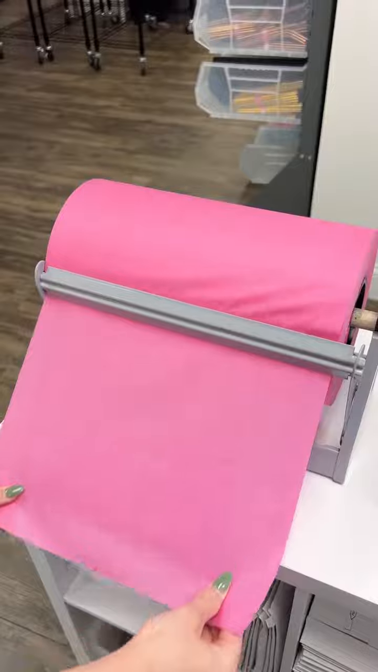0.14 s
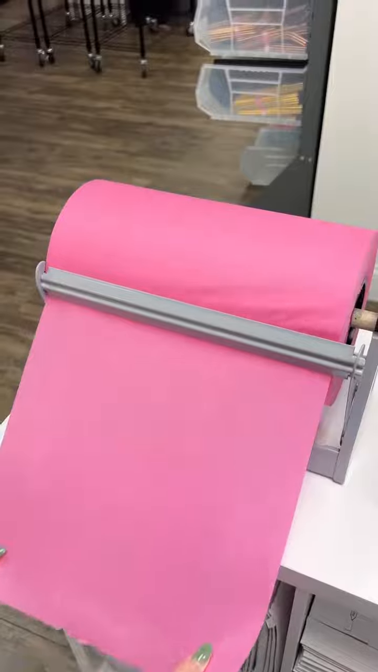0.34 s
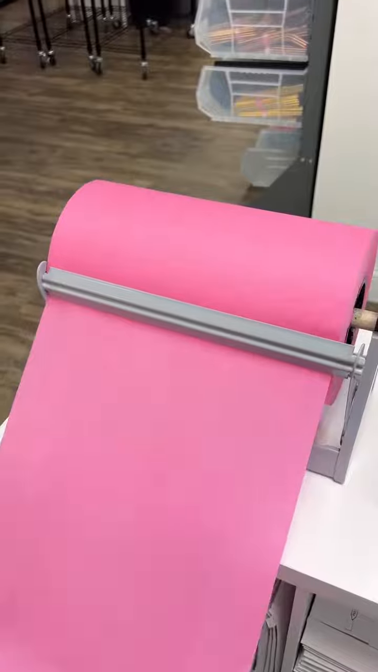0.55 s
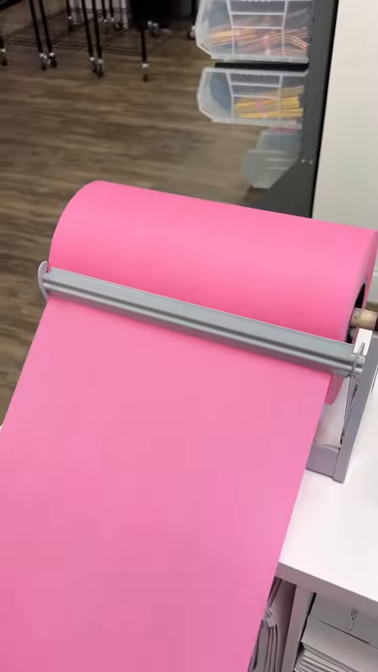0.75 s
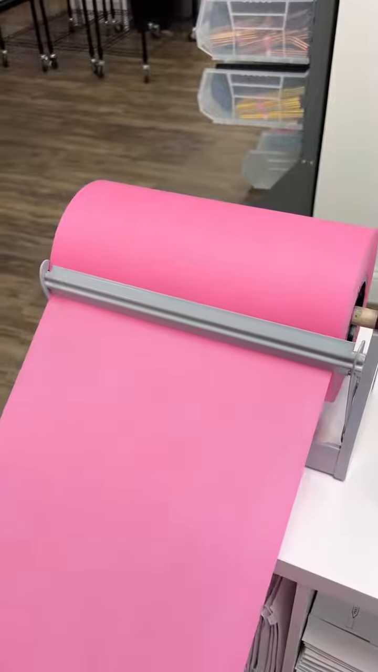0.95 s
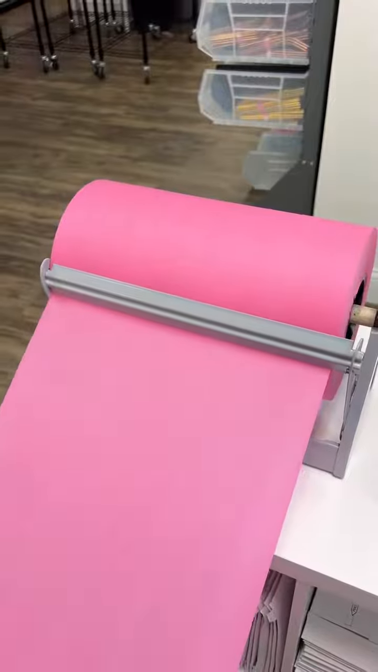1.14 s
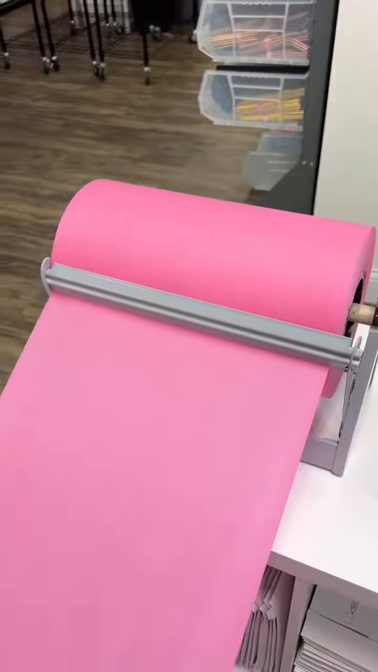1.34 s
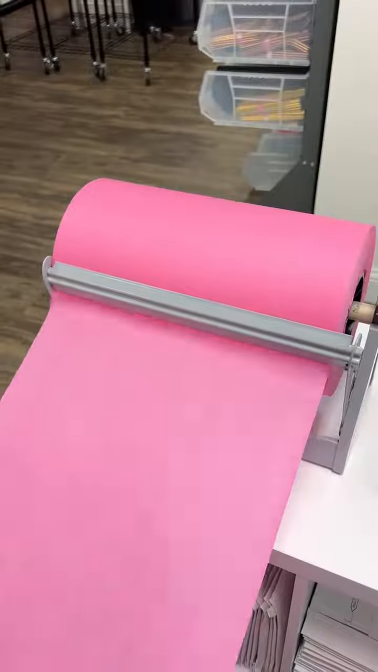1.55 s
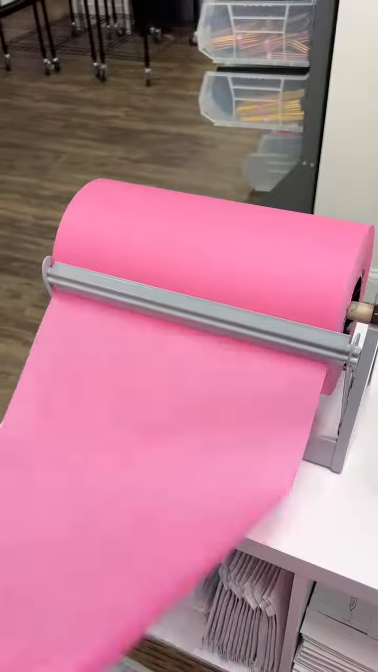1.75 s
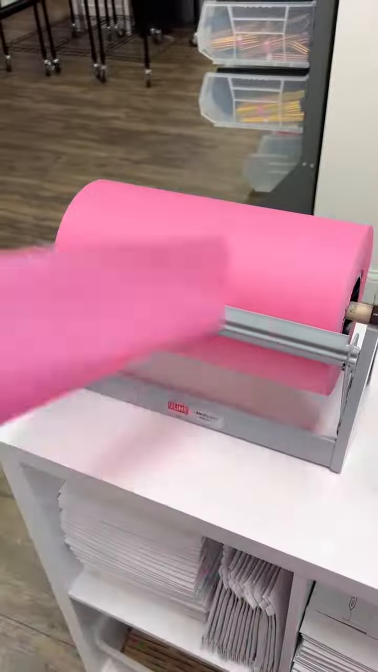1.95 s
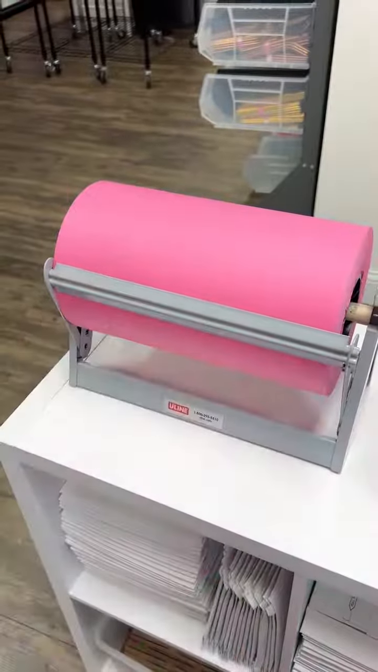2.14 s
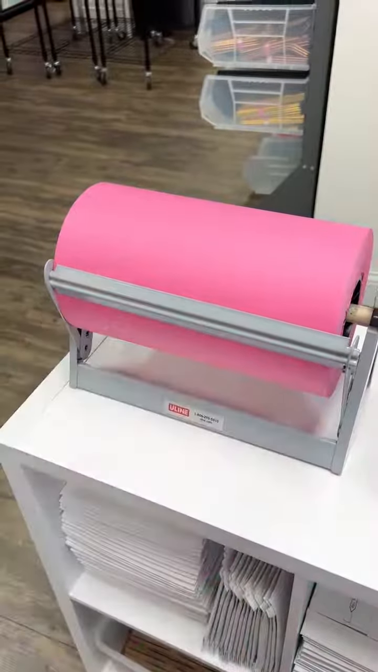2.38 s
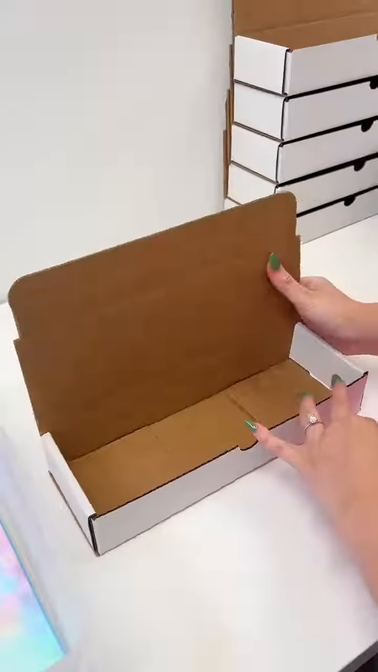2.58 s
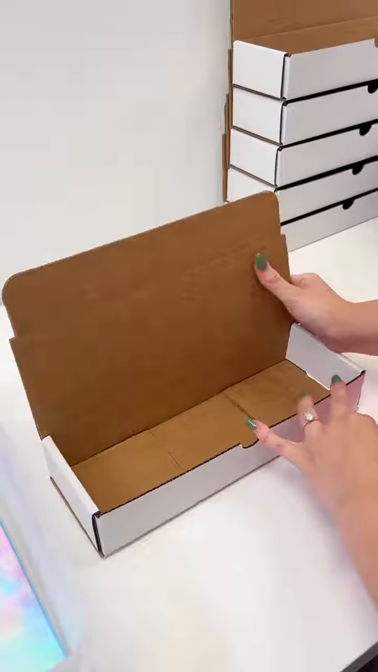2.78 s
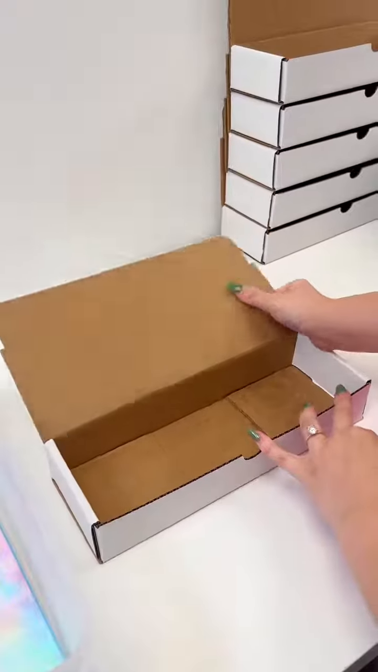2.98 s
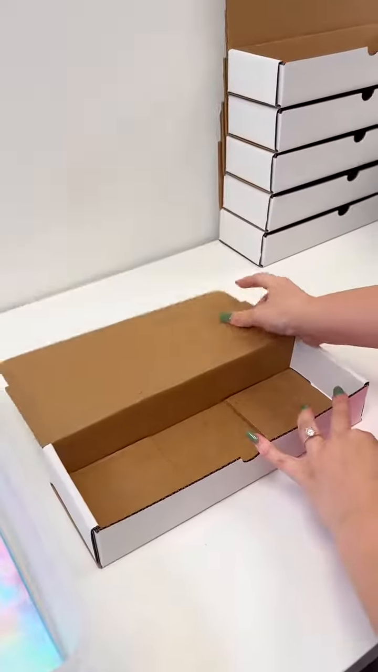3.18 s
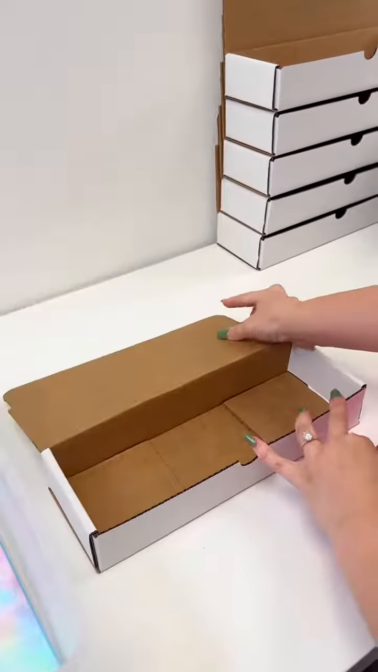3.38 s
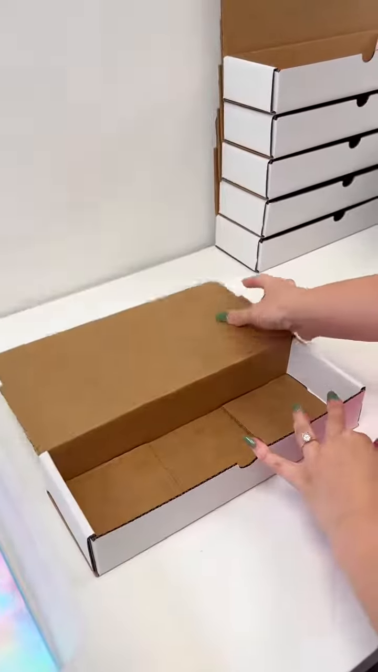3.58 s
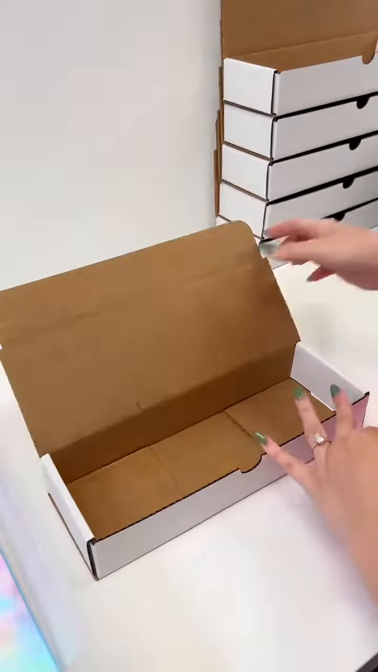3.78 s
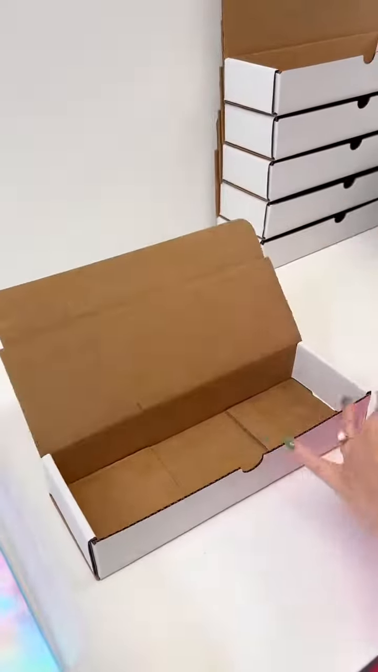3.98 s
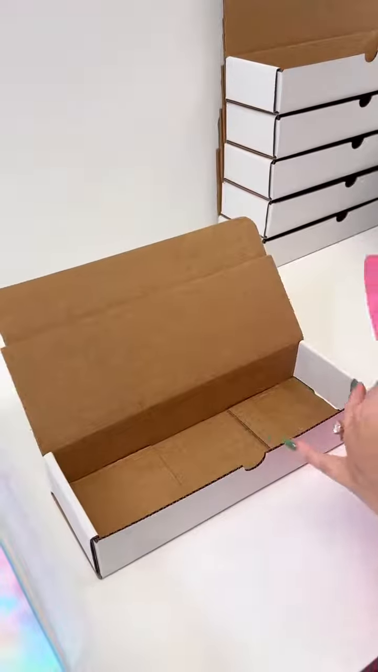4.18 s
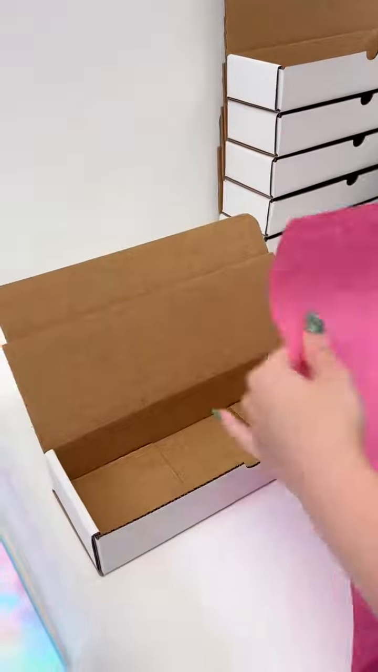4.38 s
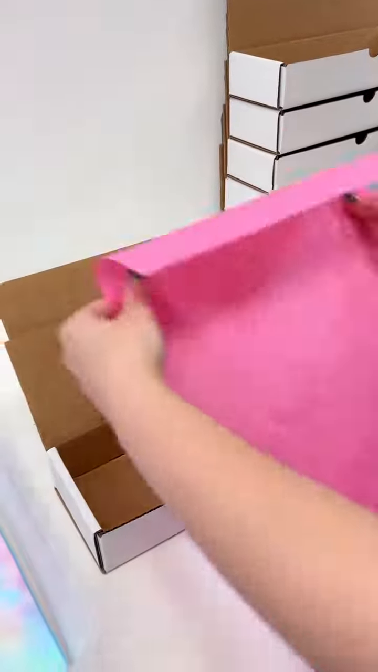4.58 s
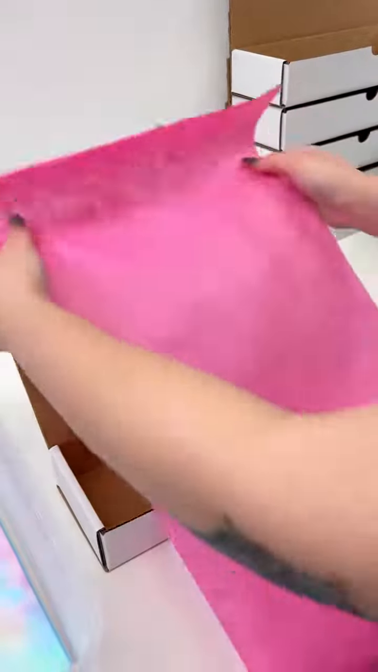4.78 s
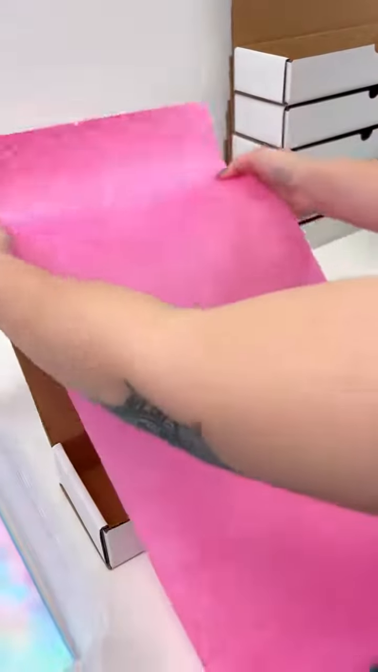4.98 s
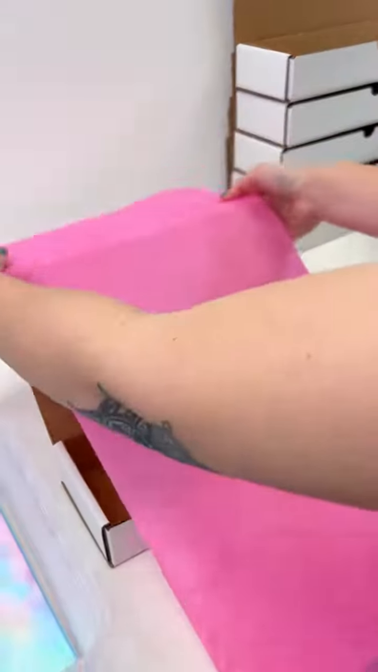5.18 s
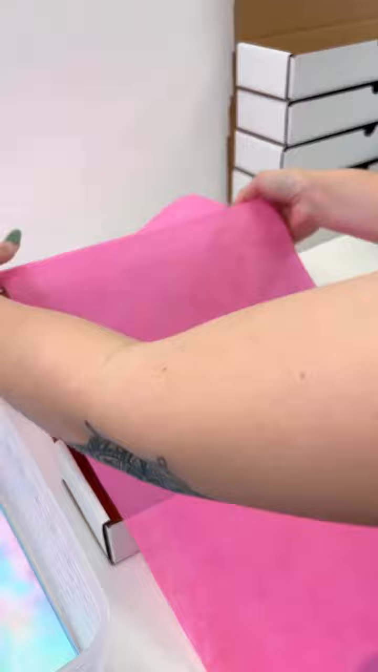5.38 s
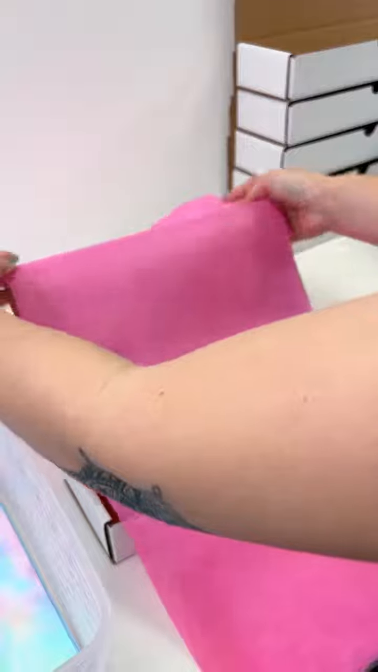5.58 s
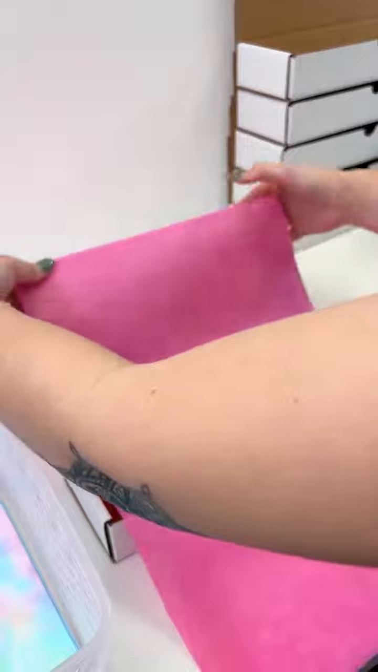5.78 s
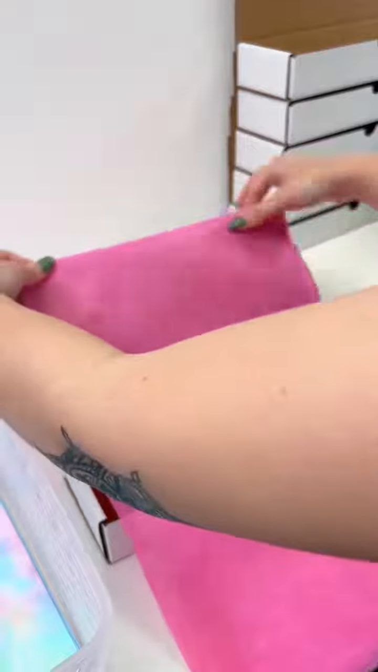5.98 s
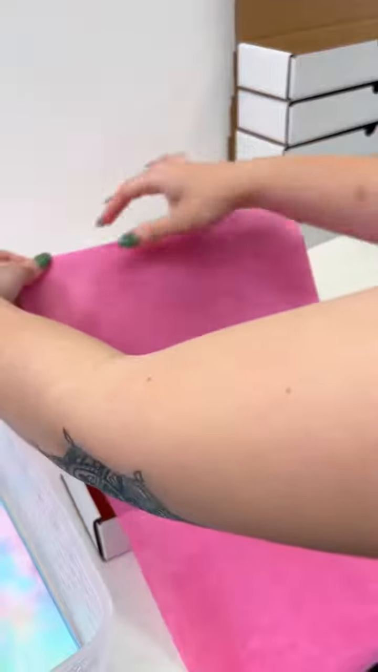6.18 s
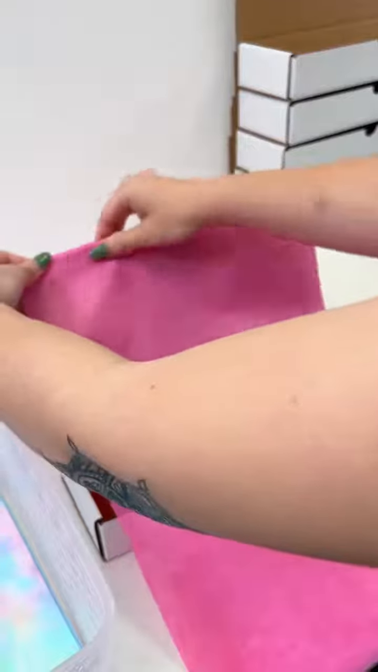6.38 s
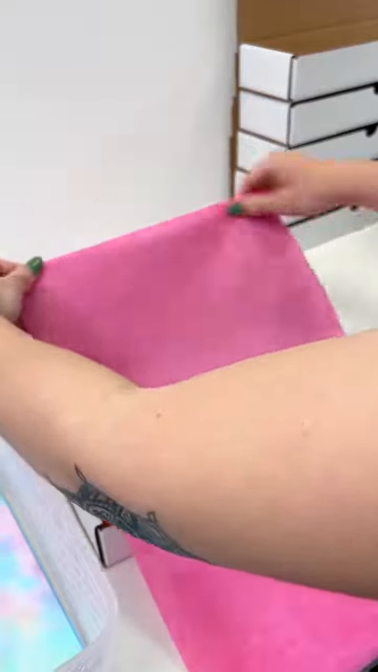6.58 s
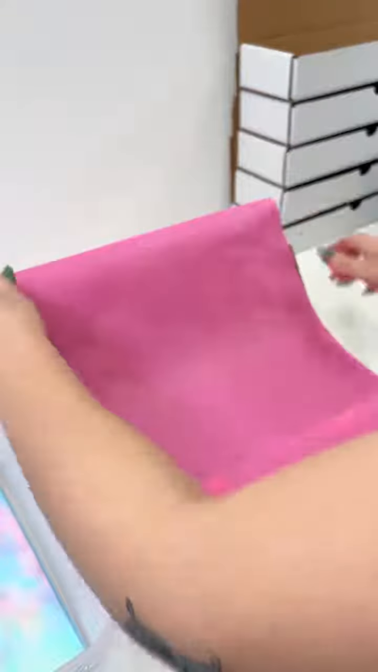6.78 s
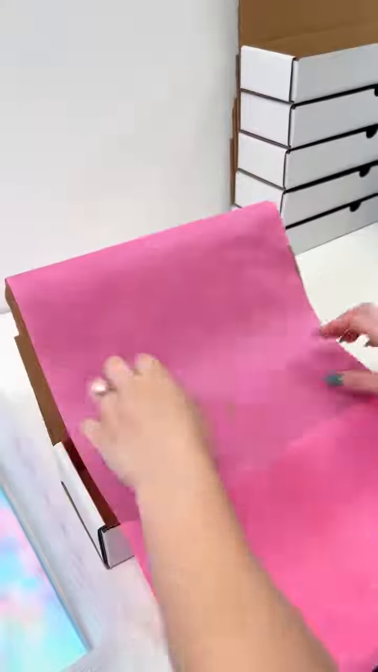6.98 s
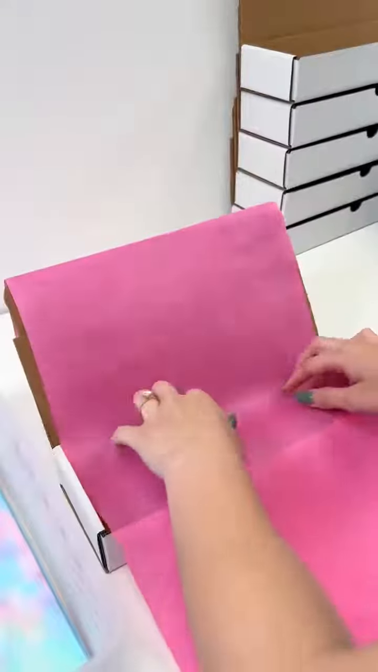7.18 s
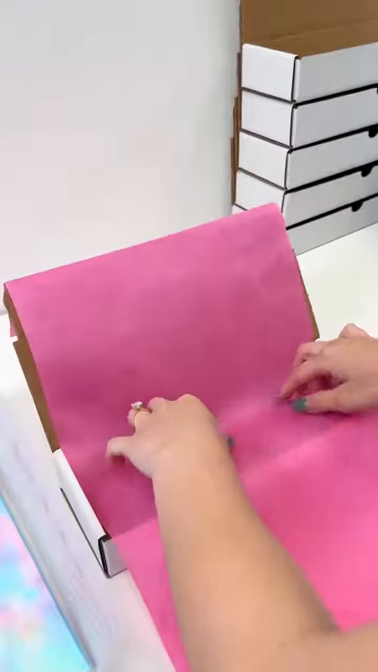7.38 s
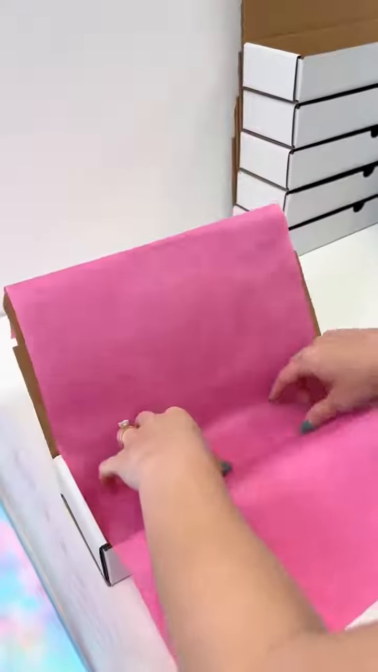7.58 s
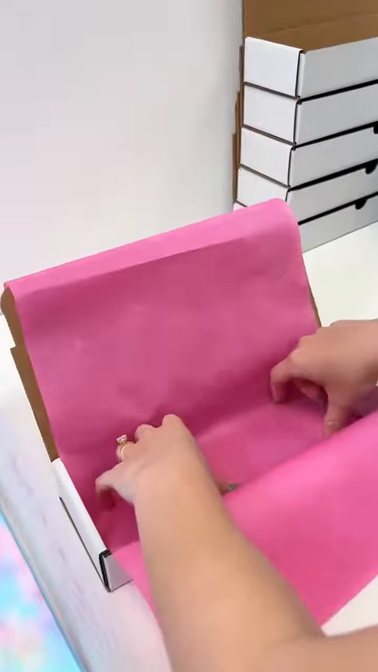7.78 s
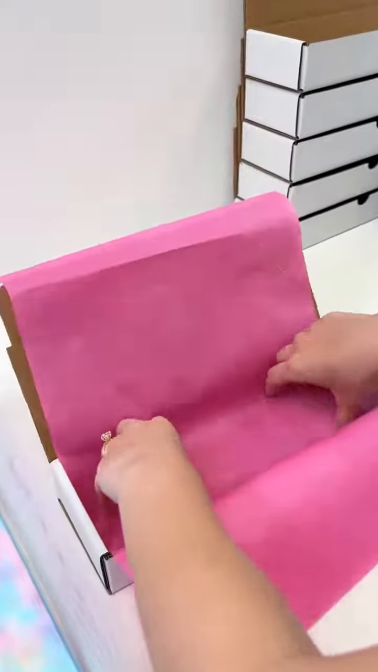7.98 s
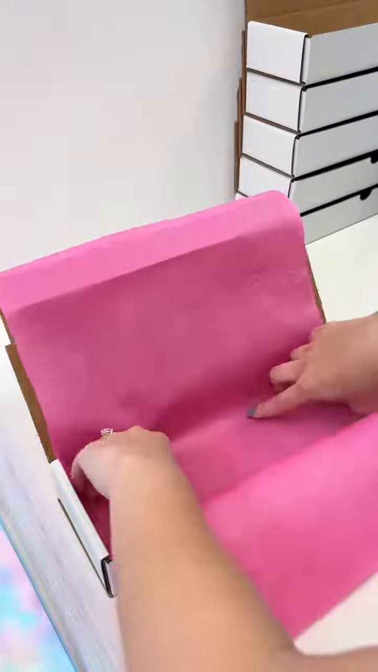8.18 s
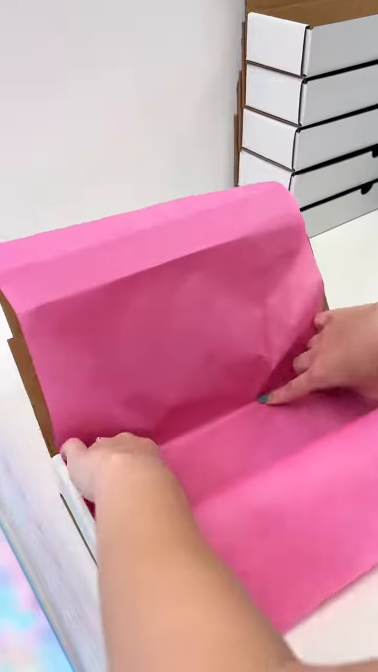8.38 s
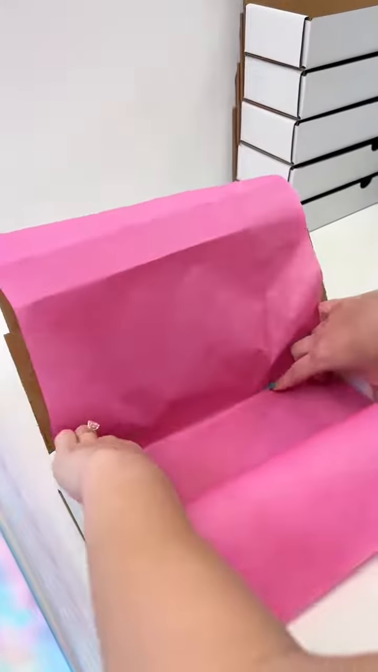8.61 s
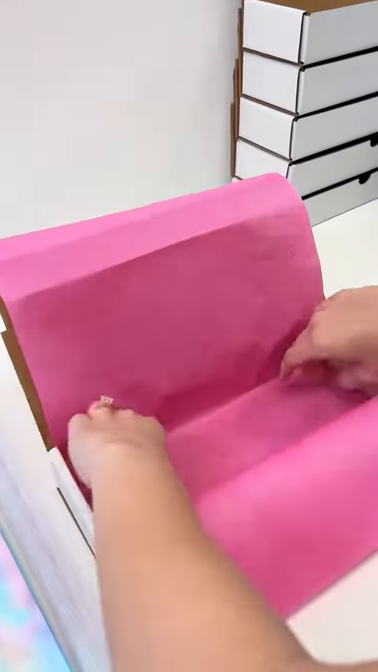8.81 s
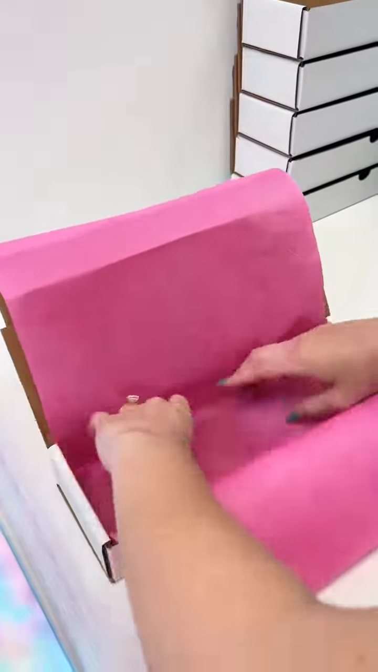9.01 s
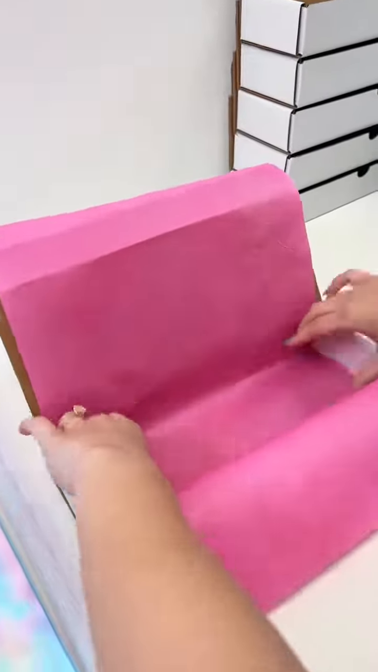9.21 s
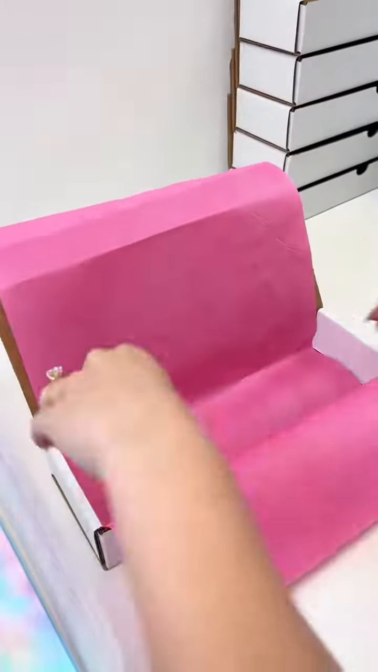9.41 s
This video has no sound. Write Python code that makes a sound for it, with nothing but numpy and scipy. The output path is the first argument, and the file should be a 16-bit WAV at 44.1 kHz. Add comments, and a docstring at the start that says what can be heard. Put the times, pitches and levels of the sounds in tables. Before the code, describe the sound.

Close, dry paper handling: a smooth pull, a short fierce tear, a hollow cardboard pop, then intermittent crinkling and snapping over a low room rumble.

```python
"""In a small room with a low ventilation rumble, wrapping paper is pulled off a roll and torn along
the cutter bar, close to the microphone. The lid of a cardboard box is bent back until its fold pops;
then the sheet is laid over the box and pressed in, rustling and snapping. Friction is filtered noise
and random fibre slips, creases are bursts ringing a facet, and the box is a set of damped modes."""
import sys
import numpy as np
from scipy import signal
from scipy.fft import rfft, irfft, next_fast_len
from scipy.io import wavfile
from scipy.ndimage import uniform_filter1d, minimum_filter1d, map_coordinates

SR = 44100
rng = np.random.default_rng(int(sys.argv[2]) if len(sys.argv) > 2 else 0)


def materialize(psi):
    """Save the field psi as 16-bit PCM at rate SR to the path in sys.argv[1].

    A 1-D psi becomes a single channel; in a 2-D psi each row is a channel.
    """
    bounded = np.clip(np.atleast_2d(psi).T, -1, 1)
    quanta = np.round(bounded * 32767).astype(np.int16)
    wavfile.write(sys.argv[1], SR, quanta)


N = 416744
TIME = np.arange(N) / SR

# spectrum of the ventilation: (frequency [Hz], level [dB])
RUMBLE_COLOUR = [(25, -6.5), (36, -1), (90, 3), (120, -1.5), (155, -13.5), (340, -13), (600, -22.5),
                 (13000, -63)]
# decay of the diffuse tail: (frequency [Hz], t60 [s])
ROOM_T60 = [(100, 0.47), (12000, 0.28)]
# spectrum of the reflections and rumble that differ between the channels: (frequency [Hz], level [dB])
SPREAD_COLOUR = [(330, -54.5), (650, -11), (1600, -48), (2800, -12.5), (12000, -14.5)]
# treble shelf, the level drops 17 dB around 13 kHz: (frequency [Hz], level [dB])
TOP_COLOUR = [(12700, 0), (13400, -17)]

# rubbed hollow box panels: (frequency [Hz], level [dB])
BOX_COLOUR = [(120, -27.5), (220, -3.5), (365, 0.5), (460, -3), (680, -8.5), (1100, -6), (4000, -55)]
# ringing modes of the cardboard panels: (frequency [Hz], level [dB], t60 [s])
BOX_MODES = [(88.6, 10.5, 0.089), (219, 3, 0.078), (364, 6.5, 0.0453), (428, 2, 0.052), (606, -18, 0.064),
             (882, -1.5, 0.027), (1028, 6, 0.018)]
# pops of the fold and knocks on the box: (time [s], level [dB], pitch of the struck spot [Hz])
KNOCKS = [(2.6219, -34, 1720), (2.826, -4, 490), (2.947, -30.5, 480), (3.243, -25, 817), (3.252, -32, 131),
          (3.61, -32.5, 1750), (5.428, -36.5, 350), (5.513, -31, 367), (5.817, -29.5, 330),
          (8.875, -33.5, 430), (8.991, -24.5, 1210), (9.028, -26.5, 500)]

# the torn sheet trailing through the air, with one swish; at 2.463 s the sound breaks off at once: (time [s],
# level [dB])
TRAIL_LEVEL = [(2.05, -33), (2.16, -39), (2.195, -32), (2.23, -35), (2.25, -45), (2.463, -47.5)]
# the sheet lifted and pulled taut against the bar: (time [s], level [dB])
LIFT_LEVEL = [(1.45, -59), (1.53, -49.5), (1.6, -34), (1.74, -28.5), (1.83, -49)]
# spectrum of the sheet moving freely: (frequency [Hz], level [dB])
LOOSE_COLOUR = [(150, -11.5), (2700, 0), (13000, -18.5)]
# paper sliding under the cutter bar: (time [s], level [dB])
PULL_LEVEL = [(0, -30.5), (.3, -35), (.75, -33), (1.05, -35.5), (1.32, -40), (1.45, -57)]
# spectrum of that sliding: (frequency [Hz], level [dB])
PULL_COLOUR = [(330, -12), (550, -17.5), (1000, -14.5), (2200, -6), (4700, -6), (5300, -12.5), (7700, -8),
               (8800, -15.5), (11900, -10.5), (13000, -21.5)]
# the tear running along the bar: (time [s], level [dB], brightness [dB per octave])
TEAR_LEVEL = [(1.828, -37, -4.5), (1.843, -14.5, 2), (1.853, -18, -2.5), (1.872, -14.5, -1),
              (1.92, -16, 1.5), (1.96, -19, -0.5), (2.045, -17.5, 2), (2.07, -44, 5.5)]
# spectrum of the tear before brightening: (frequency [Hz], level [dB])
TEAR_COLOUR = [(120, -17), (330, -7.5), (520, -4.5), (1250, -4), (3200, 0.5), (4600, -2), (5500, -6),
               (13000, -17.5)]

# creases snapping in the paper and cardboard: (time [s], peak level [dB], decay time [s])
SNAPS = [(0.079, -10.5, 0.00063), (1.765, -15, 0.0046), (3.518, -45, .003), (3.61, -29.5, .002),
         (3.94, -31.5, 0.015), (4.357, -21.5, 0.015), (4.415, -18.5, 0.0094), (4.5244, -27, 0.0051),
         (4.577, -41, 0.02), (4.679, -33, 0.0084), (4.935, -31, 0.014), (5.072, -28, 0.0091),
         (5.26, -42, 0.0065), (5.51, -29, 0.0087), (5.57, -24.5, 0.0049), (5.748, -30.5, 0.0034),
         (5.9237, -17.5, 0.0021), (6.147, -46.5, 0.012), (6.177, -46, .006), (6.264, -31, 0.011),
         (6.841, -46, 0.0068), (7.187, -22.5, 0.0055), (7.495, -19, 0.005), (7.556, -33, 0.0075),
         (7.741, -25, 0.002), (7.758, -16.5, 0.0023), (7.806, -19.5, 0.0068), (7.843, -29, 0.019),
         (8.089, -24.5, 0.0039), (8.242, -15.5, 0.0039), (8.387, -24, 0.0045), (8.52, -23.5, 0.0014),
         (8.5661, -19.5, 0.0038), (8.791, -30, 0.0026), (8.9875, -29.5, 0.0089), (9.104, -23, 0.017),
         (9.177, -24, 0.004)]
# spectrum of the handled sheet and its creases: (frequency [Hz], level [dB])
SHEET_COLOUR = [(150, -18), (400, -6), (700, -9), (1000, -4.5), (1700, -4.5), (2700, -6.5), (3600, -9),
                (6400, -11.5), (9200, -20), (13000, -22)]
# creases ring lower as the sheet is pressed into the box: (time [s], centre pitch [Hz])
FACET_HZ = [(7.1, 2460), (7.7, 1600), (9.1, 1270)]
# strokes of the hands, first on the bare box, then laying, smoothing and tucking in the sheet:
# (start [s], length [s], rustle level [dB], swell over the length [dB],
#  crispness [dB per octave], box body level [dB])
STROKES = [(2.477, 0.32, -60, -26, 3.5, -64.5), (2.801, 0.083, -49, -7, 4, -38),
           (2.913, 0.12, -58.5, 13, 4.5, -46), (3.006, 0.1, -46.5, -3.5, 3.5, -48.5),
           (3.198, 0.018, -46, -4, 2.5, -44), (3.39, 0.46, -60.5, 23, 0.5, -69),
           (3.87, 1.24, -56, 9, -0.5, -60.5), (4.237, 0.13, -44, -10, 2, -61),
           (4.304, 0.13, -37, -3.5, 0.5, -49.5), (4.517, 0.36, -47.5, -4, 1, -55),
           (5.042, 0.25, -44, -10.5, -1, -56), (5.307, 0.16, -49, -7, 0.5, -51),
           (5.423, 0.095, -45, 11, 4.5, -46.5), (5.584, 0.26, -45, 0, 1.3, -47),
           (5.858, 0.13, -38.5, 8, 2, -47), (6.253, 0.33, -35.5, -1.5, 3.1, -43),
           (6.595, 0.22, -49, -31, 1, -56.5), (7.023, 0.04, -51, 14, -3, -62),
           (7.049, 0.091, -34, 5, 1.5, -45), (7.166, 0.036, -31, 4.5, 1.5, -42),
           (7.26, 0.27, -39.5, 11.5, 1.4, -54.5), (7.519, 0.19, -31, 1.5, 1.5, -43),
           (7.735, 0.22, -43, 1, 0.5, -53.5), (7.933, 0.32, -34.5, 3.5, 2.3, -43),
           (8.29, 0.39, -45.5, -2, 2.5, -49.5), (8.64, 0.073, -38, 2.5, 1.6, -47),
           (8.862, 0.11, -47, -4, -1, -46.5), (8.993, 0.21, -35, -2, 0.5, -43.5)]

ATTACK_S, RELEASE_DB_PER_S = 0.031, 244  # every movement takes hold quickly and dies away when it stops
SPOT_DB_PER_OCTAVE = 8.5  # modes far from the pitch of the struck spot ring less
THUD_S, THUD_Q, THUD_DB = 0.0048, 4.4, 4.5  # the struck spot gives a broad, quickly damped thud
CREASES_PER_S = 120
FACET_OCTAVES, FACET_Q = 0.36, 11.2  # spread of the creases' pitches, and sharpness of each
FACET_WIDTH_HZ, FACET_DB = 1100, -7.5  # the facet under the rubbing fingers sings broadly
CEILING = .8  # limiter threshold, as a fraction of full scale
EDGE_HZ = 15850  # upper limit of the band


def amp(db):
    """Level definition: decibels to gain."""
    return 10 ** (np.asarray(db) / 20)


def unit(x):
    """Normalization: scales a signal to an rms of one."""
    return x / np.sqrt(np.mean(x ** 2) + 1e-20)


def read(points, hz):
    """Interpolation of a spectrum on a log-frequency axis."""
    f, value = np.transpose(points)
    return np.interp(np.log(hz + 1), np.log(f + 1), value)


def curve(rows, axis=1):
    """Linear interpolation of one table column at every sample."""
    rows = np.asarray(rows)
    return np.interp(TIME, rows[:, 0], rows[:, axis])


def level(rows):
    """Amplitude envelope: the gain of a movement, silent outside it."""
    active = 1. * ((TIME >= rows[0][0]) & (TIME <= rows[-1][0]))
    return amp(curve(rows)) * uniform_filter1d(active, size=200)


def add(mix, s, sound):
    """Superposition: adds a sound to the mix at s seconds, in place."""
    part = mix[round(s * SR):][:len(sound)]
    part += sound[:len(part)]


def colour(x, points, size=4096):
    """Minimum-phase filtering: the causal response to a spectrum keeps the sharp fronts of clicks."""
    hz = abs(np.fft.fftfreq(size, 1 / SR))
    log_gain = np.log(amp(np.maximum(read(points, hz), -100)))
    taps = np.fft.ifft(np.exp(np.conj(signal.hilbert(log_gain)))).real
    return signal.oaconvolve(x, taps[:size // 2])[:len(x)]


def brighten(x, tilt_db, order=7):
    """Spectral tilt: octave bands are weighted about 3 kHz by a tilt per octave that may move."""
    size = next_fast_len(len(x))
    octave = np.log2((np.fft.rfftfreq(size, 1 / SR) + 1) / 3000)
    centres = np.arange(order) - order + 3
    spectrum = rfft(x, size)
    tilted = 0
    for c in centres:
        share = np.interp(octave, centres, 1. * (centres == c))  # overlapping triangular bands
        tilted = tilted + irfft(spectrum * share, size)[:len(x)] * amp(tilt_db * c)
    return tilted


def wander(per_s, size=8192):
    """Slow random modulation: interpolated Gaussian values with an rms of one."""
    return unit(np.interp(TIME * per_s, np.arange(size), rng.standard_normal(size)))


def crackle(per_s, spread_db, clump_db, clumps_per_s, hiss):
    """Stick-slip friction: random fibre slips of uneven size, in clumps, over a fine hiss."""
    chance = rng.random(N) * SR / per_s
    at = np.flatnonzero(chance < 1)
    rarity = np.minimum(-np.log(chance[at]), 4)
    slips = np.zeros(N)
    slips[at] = (-1.) ** at * amp(spread_db * rarity)  # a positive spread makes the rarer slips larger
    return (unit(slips) + hiss * rng.standard_normal(N)) * amp(clump_db * wander(clumps_per_s))


def scatter(decay_s, size=1024):
    """Multiple scattering: a short response of dense, decaying reflections with unit energy."""
    taps = rng.standard_normal(size) * np.exp(-np.arange(size) / SR / decay_s)
    return taps / np.linalg.norm(taps)


def sheet(points, per_s, spread_db, clump_db, ring_s, hiss=1.0, count=10):
    """Independent radiators: facets crackle separately, each with its own brief ring."""
    facets = np.zeros(N)
    for _ in range(count):
        slips = crackle(per_s / count, spread_db, clump_db, clumps_per_s=120, hiss=hiss)
        facets += signal.oaconvolve(slips, scatter(ring_s))[:N]
    return unit(colour(facets, points))


def flex(x, depth_db, per_s, size=256):
    """Bending of a radiator: broad bands of the sheet's sound swell and sink by turns."""
    hz, t, z = signal.stft(x, SR, nperseg=size)
    bands = 3 * np.log2(1 + hz / 1000)
    band, moment = np.meshgrid(bands, t * per_s, indexing="ij")
    patches = map_coordinates(rng.standard_normal((16, 2048)), [band, moment], order=1, mode="wrap")
    return signal.istft(z * amp(depth_db * patches), SR, nperseg=size)[1][:N]


def resonate(x, hz, width_hz):
    """Damped resonance: a one-pole filter in a rotating frame follows a moving pitch."""
    turn = np.exp(2j * np.pi * np.cumsum(hz) / SR)
    r = np.exp(-np.pi * width_hz / SR)
    return (turn * signal.lfilter([1 - r], [1, -r], x / turn)).real


def movement(length, swell_db):
    """Power envelope: a quick attack, a hold that swells or sags, and a steady release in dB."""
    t = TIME[:round((length + .5) * SR)]
    attack = np.minimum(t / ATTACK_S, 1)
    hold_db = swell_db * (np.minimum(t / length, 1) - .5)
    release_db = RELEASE_DB_PER_S * np.maximum(t - length, 0)
    return (attack * amp(hold_db - release_db)) ** 2


def effort(rows, axis=2):
    """Incoherent addition: overlapping movements sum in power, at the level in the given column."""
    power = np.zeros(N)
    for row in rows:
        add(power, row[0], amp(row[axis]) ** 2 * movement(row[1], row[3]))
    return np.sqrt(power)


def crispness():
    """Power-weighted mean: each stroke has its own grip, and in overlaps the louder weighs more."""
    tilt = np.zeros(N)
    for s, length, db, swell_db, tilt_db, _ in STROKES:
        add(tilt, s, tilt_db * amp(db) ** 2 * movement(length, swell_db))
    return tilt / (effort(STROKES) ** 2 + 1e-20)


def buckle(s, decay_s, rise_s=.0005, size=6144):
    """Buckling instability: as a crease gives way, a flurry of slips rings the facet beside it."""
    t = TIME[:size]
    burst = np.exp(-t / decay_s) * (1 - np.exp(-t / rise_s))
    flurry = rng.standard_normal(size) * amp(2 * rng.standard_normal(size)) * burst
    centre_hz = np.interp(s, *np.transpose(FACET_HZ))
    hz = centre_hz * 2 ** (FACET_OCTAVES * rng.standard_normal())
    facet = signal.iirpeak(min(hz, SR / 2 - 1), FACET_Q, fs=SR)
    return flurry + 2 * signal.lfilter(*facet, flurry)


def creases():
    """Random superposition: soft crinkles of irregular time, size, length and pitch run together."""
    out = np.zeros(N)
    for when, strength, length in rng.random((round(CREASES_PER_S * N / SR), 3)):
        s = when * N / SR
        crinkle = buckle(s, decay_s=.004 * (.5 + length), rise_s=.004, size=1536)
        add(out, s, amp(12 * strength ** 2) * unit(crinkle))
    return unit(colour(out, SHEET_COLOUR))


def rumble():
    """Broadband flow noise and a tone: steady ventilation with a faint, unsteady fan hum."""
    air = unit(colour(rng.standard_normal(N), RUMBLE_COLOUR, size=16384))
    hum_hz = 87 + 2 * wander(per_s=13)
    hum = np.sin(2 * np.pi * np.cumsum(hum_hz) / SR)
    return amp(-46) * air + amp(-56.5) * hum


def room(x, size=22050):
    """Diffuse reverberation: a noise tail of unit energy whose treble dies first."""
    hz, t, z = signal.stft(rng.standard_normal(size), SR, nperseg=256)
    decay = amp(-60 * t / read(ROOM_T60, hz)[:, None])
    tail = signal.istft(z * decay, SR, nperseg=256)[1]
    tail *= 1 - np.exp(-TIME[:len(tail)] / 0.0017)  # soft onset
    return signal.oaconvolve(x, tail / np.linalg.norm(tail))[:N]


def trail():
    """Turbulent friction: the loose sheet slides away with a smooth hiss."""
    return level(TRAIL_LEVEL) * unit(colour(rng.standard_normal(N), LOOSE_COLOUR))


def lift():
    """Impulsive excitation of a membrane: the sheet flutters and ticks as it is drawn taut."""
    flutter = sheet(LOOSE_COLOUR, per_s=870, spread_db=2.5, clump_db=3.5, ring_s=0.0011, hiss=0.93)
    return level(LIFT_LEVEL) * flutter


def pull():
    """Sliding friction: dense, even slips of the paper under the bar."""
    grain = crackle(per_s=7600, spread_db=2.5, clump_db=0.6, clumps_per_s=81, hiss=0.81)
    return level(PULL_LEVEL) * unit(colour(grain, PULL_COLOUR))


def box_body():
    """Forced vibration: even rubbing against the box excites its hollow panels."""
    rub = rng.standard_normal(N) * amp(2 * wander(per_s=60))
    return effort(STROKES, axis=5) * unit(colour(rub, BOX_COLOUR))


def knocks():
    """Modal excitation: after a tick and a thud the panels ring; slow bending waves bring low modes last."""
    out, t = np.zeros(N), TIME[:16384]
    for s, db, spot_hz in KNOCKS:
        puff = rng.standard_normal(len(t)) * np.exp(-t / .0025)
        tick = colour(puff, [(1400, 3.5), (4200, -16.5), (6000, -46)])  # (Hz, dB)
        push = rng.standard_normal(len(t)) * np.exp(-t / THUD_S)
        blow = amp(THUD_DB) * signal.lfilter(*signal.iirpeak(spot_hz, THUD_Q, fs=SR), push)
        for hz, mode_db, t60 in BOX_MODES:
            age = np.maximum(t - 0.53 / hz, 0)  # arrival about half a period late
            swell = 1 - np.exp(-2 * age * hz)
            distance_db = SPOT_DB_PER_OCTAVE * abs(np.log2(hz / spot_hz))
            ring_db = mode_db - distance_db - 60 * age / t60
            blow += amp(ring_db) * swell * np.sin(2 * np.pi * hz * age)
        add(out, s, amp(db) * (tick + blow))
    return out


def snaps():
    """Sudden release of strain: the larger creases buckle with a crack; the briefer, the brighter."""
    out = np.zeros(N)
    for s, db, decay_s in SNAPS:
        tilt_db = .5 * np.log2(0.088 / decay_s)
        crack = brighten(colour(buckle(s, decay_s), SHEET_COLOUR), tilt_db)
        crack *= np.sqrt(decay_s * SR / 2) / np.linalg.norm(crack)  # rms of one at the start
        add(out, s, amp(db) * crack / 2)  # peaks reach about twice the rms
    return out


def tear():
    """Fracture: fibres break in a dense, even stream along the blade while the taut sheet bends."""
    fibres = sheet(TEAR_COLOUR, per_s=8300, spread_db=1.5, clump_db=0.0, ring_s=0.00095, hiss=0.14)
    fibres = unit(flex(fibres, depth_db=-1.0, per_s=73))
    return level(TEAR_LEVEL) * brighten(fibres, curve(TEAR_LEVEL, axis=2))


def rustle():
    """Friction and buckling: hands slide and set off small creases; the grip sets the crispness."""
    rub = sheet(SHEET_COLOUR, per_s=1700, spread_db=-1.0, clump_db=0.5, ring_s=0.0022, hiss=1.0)
    facet = amp(FACET_DB) * unit(resonate(rub, curve(FACET_HZ), FACET_WIDTH_HZ))
    paper = unit(flex(rub + facet, depth_db=2.5, per_s=35))
    return effort(STROKES) * brighten(unit(paper + creases()), crispness())


def scene():
    """Mid-side superposition: paper and box in the middle; reflections, trailing sheet and air give width."""
    near = trail() + lift() + pull() + box_body() + knocks() + snaps() + tear() + rustle()
    middle = near + amp(-12.5) * room(near) + rumble()
    table = np.pad(scatter(decay_s=.004), (SR // 1000, 0))  # the first echo is a millisecond late
    reflections = signal.oaconvolve(near, table)[:N] + amp(3.5) * room(near)
    side = colour(reflections + rumble(), SPREAD_COLOUR) + .5 * trail()
    return np.array([middle + side, middle - side])


def record(dry):
    """Peak limiting and band limiting: a fast limiter, a treble shelf, then a low-pass."""
    allowed = CEILING / np.maximum(abs(dry).max(axis=0), CEILING)
    limited = dry * uniform_filter1d(minimum_filter1d(allowed, size=200), size=200)
    shelved = np.array([colour(channel, TOP_COLOUR) for channel in limited])
    low_pass = signal.firwin(511, EDGE_HZ, window=("kaiser", 9), fs=SR)
    return signal.oaconvolve(shelved, low_pass[None], "same")


dry = scene()
out = record(dry)
materialize(out)
```